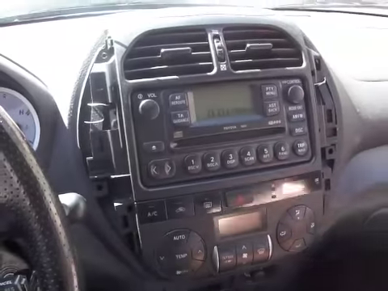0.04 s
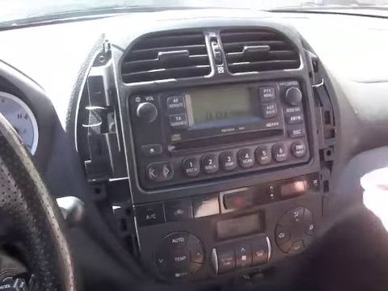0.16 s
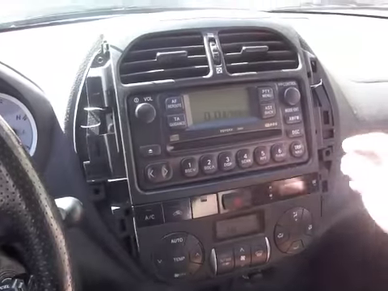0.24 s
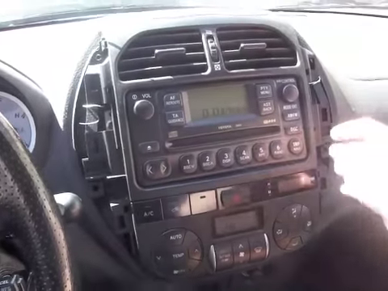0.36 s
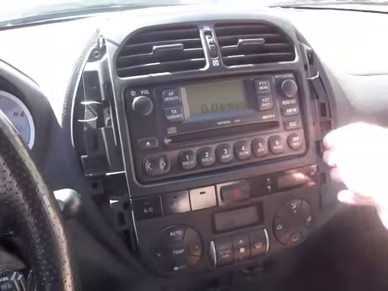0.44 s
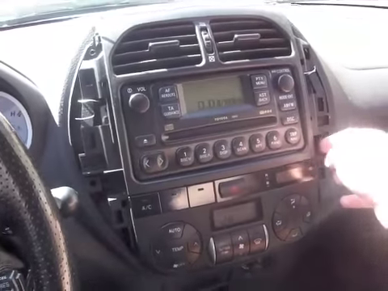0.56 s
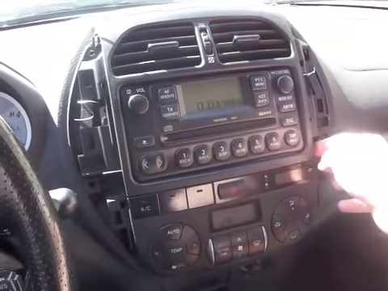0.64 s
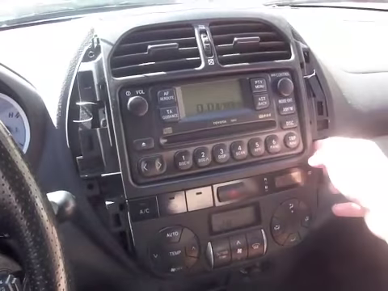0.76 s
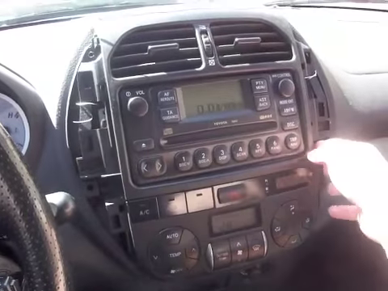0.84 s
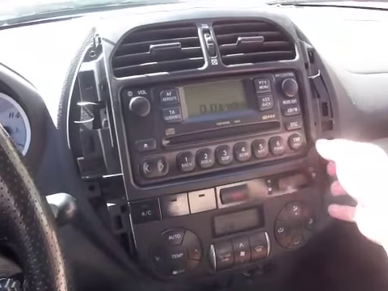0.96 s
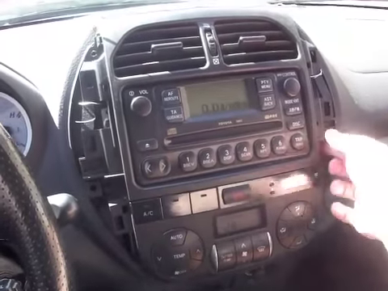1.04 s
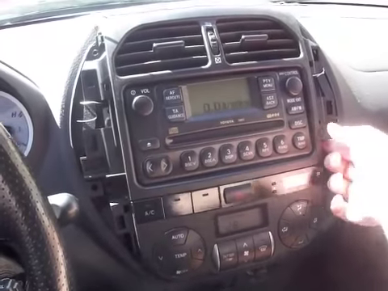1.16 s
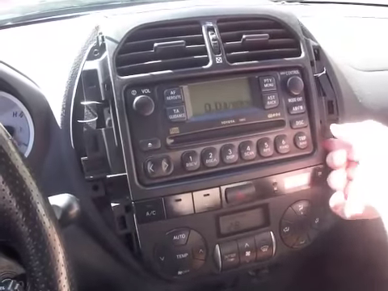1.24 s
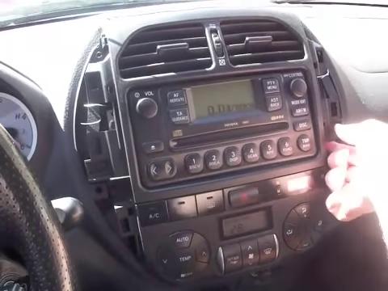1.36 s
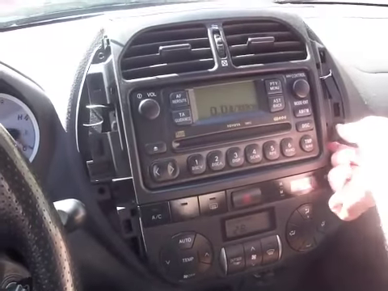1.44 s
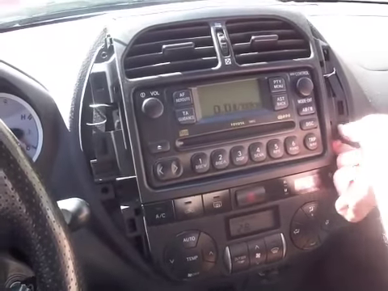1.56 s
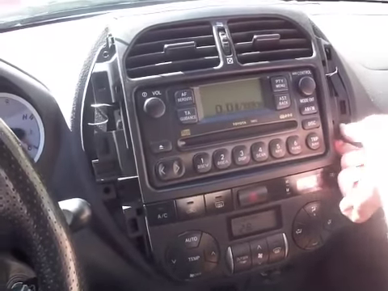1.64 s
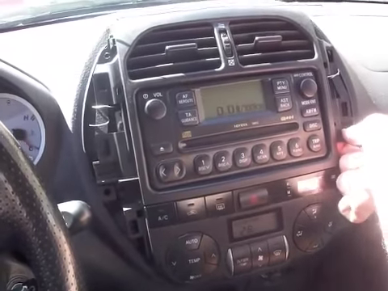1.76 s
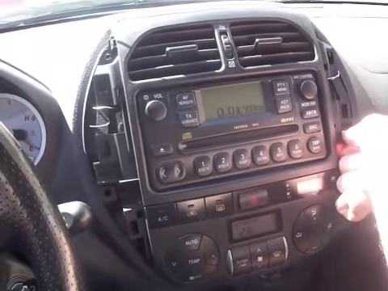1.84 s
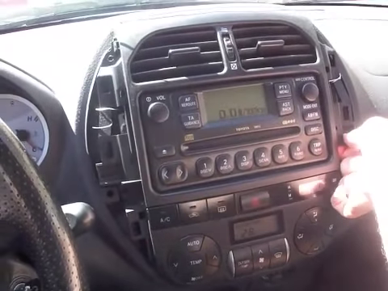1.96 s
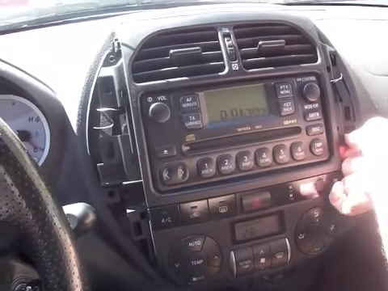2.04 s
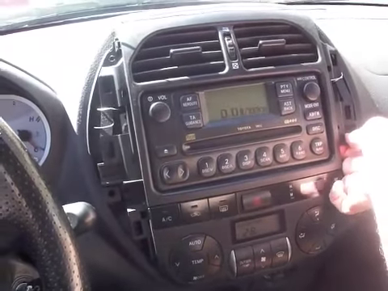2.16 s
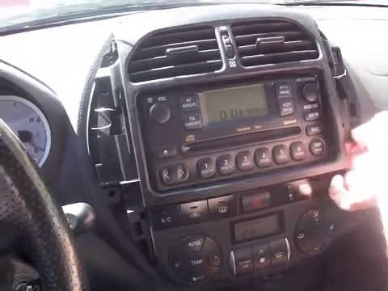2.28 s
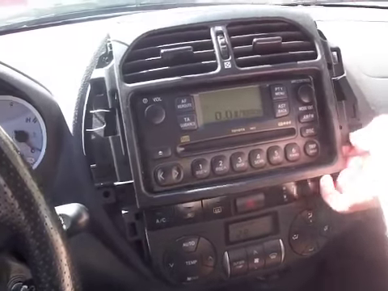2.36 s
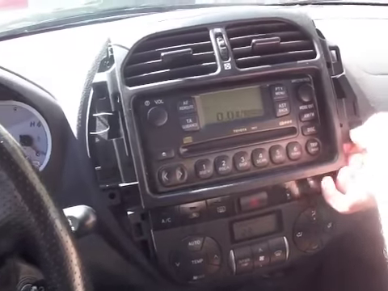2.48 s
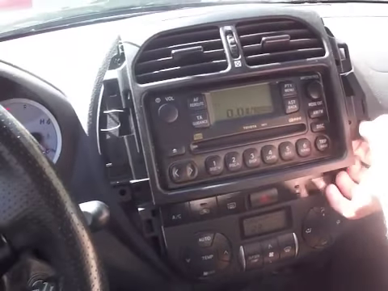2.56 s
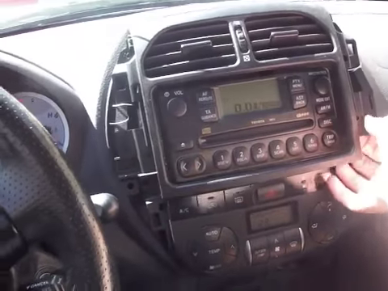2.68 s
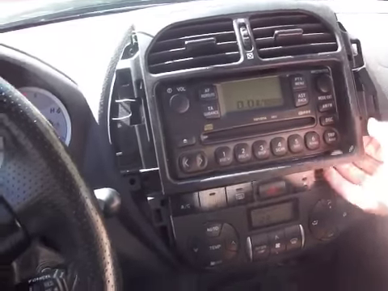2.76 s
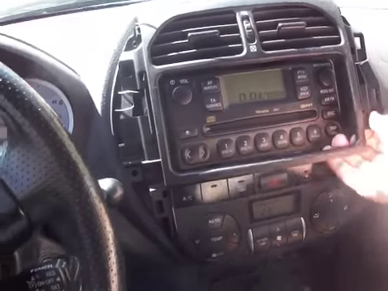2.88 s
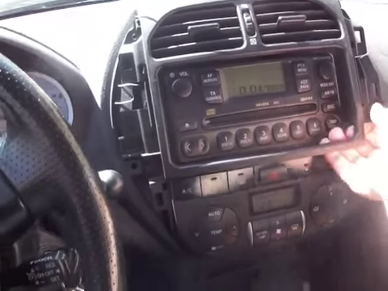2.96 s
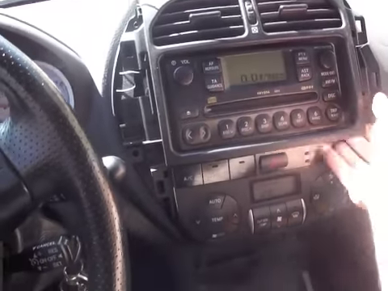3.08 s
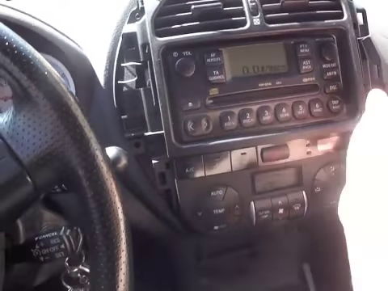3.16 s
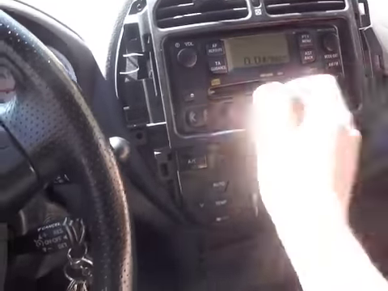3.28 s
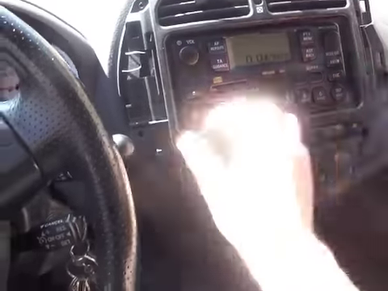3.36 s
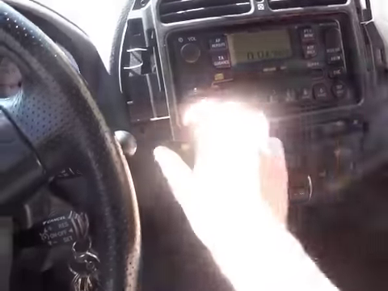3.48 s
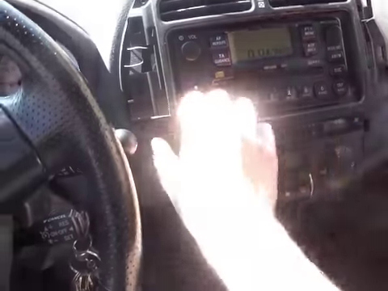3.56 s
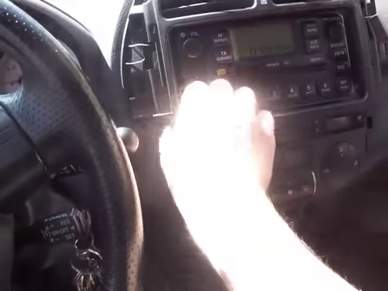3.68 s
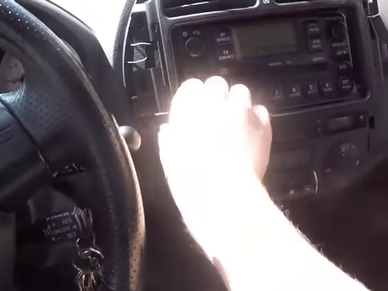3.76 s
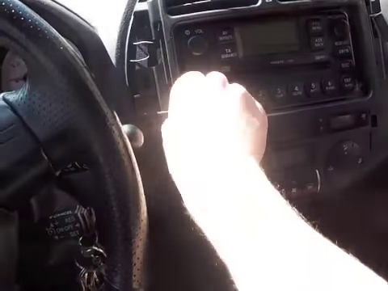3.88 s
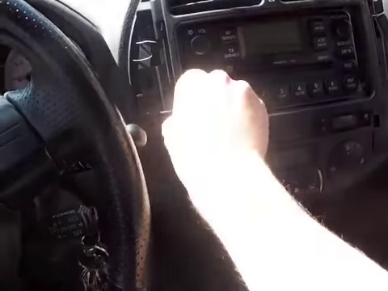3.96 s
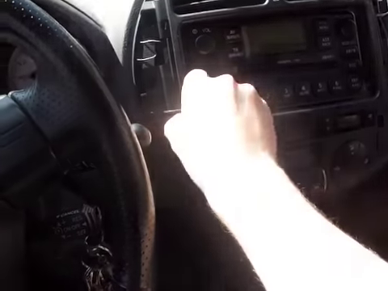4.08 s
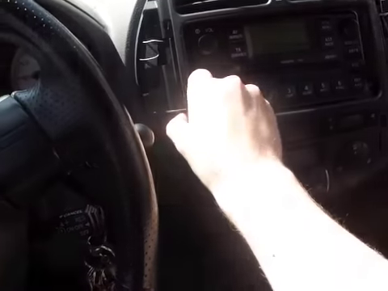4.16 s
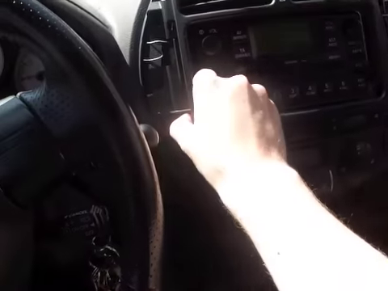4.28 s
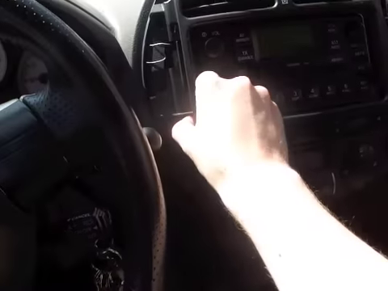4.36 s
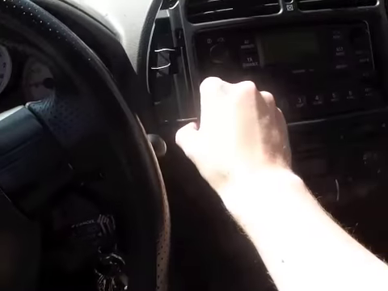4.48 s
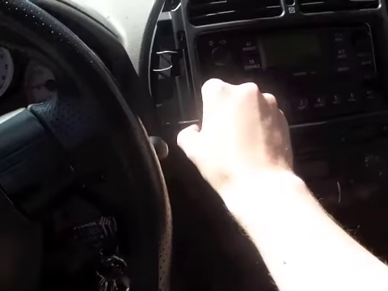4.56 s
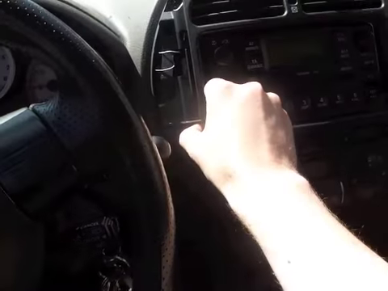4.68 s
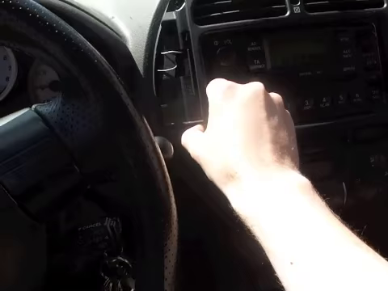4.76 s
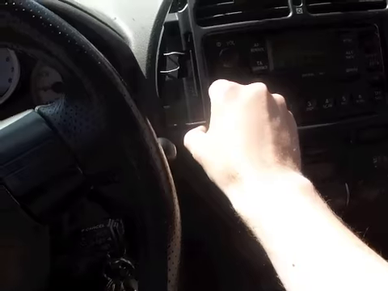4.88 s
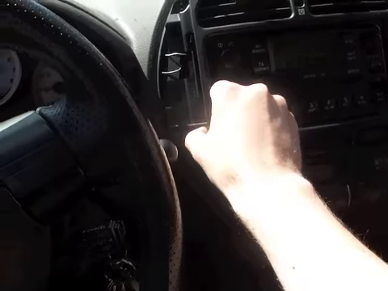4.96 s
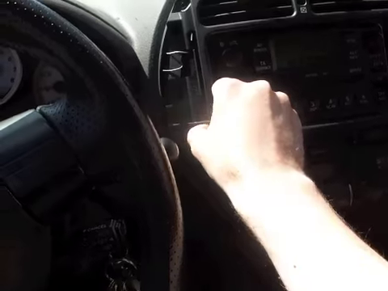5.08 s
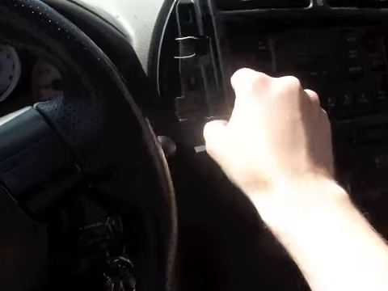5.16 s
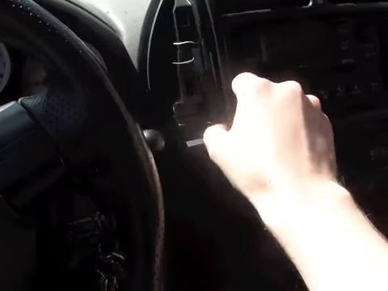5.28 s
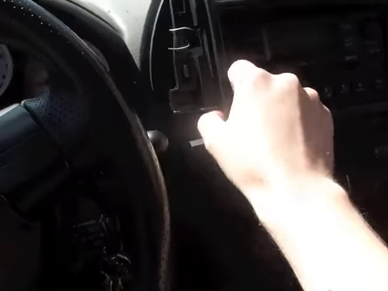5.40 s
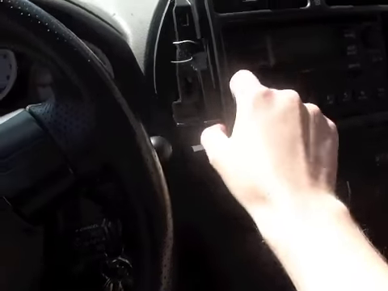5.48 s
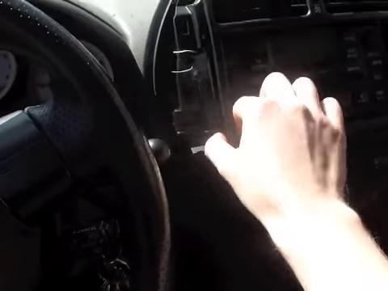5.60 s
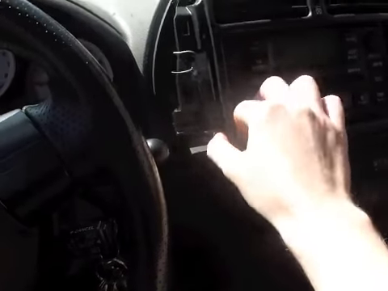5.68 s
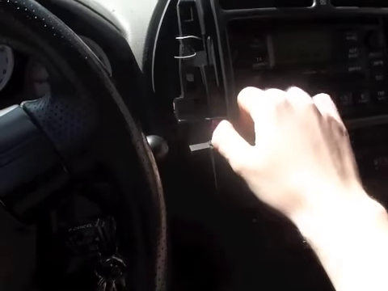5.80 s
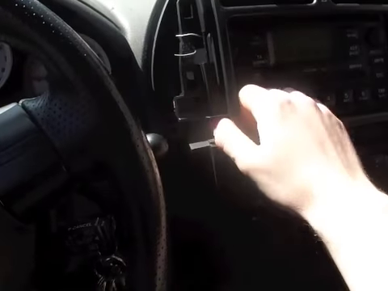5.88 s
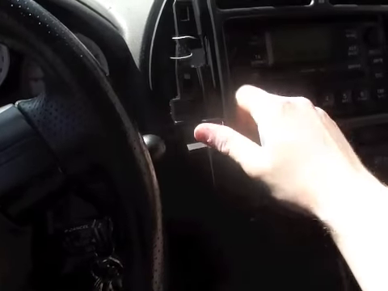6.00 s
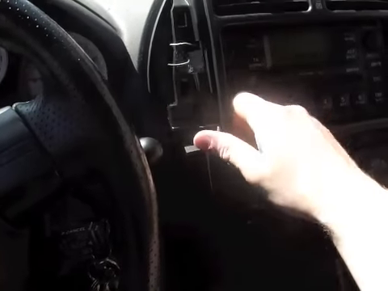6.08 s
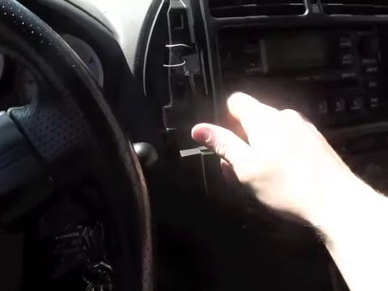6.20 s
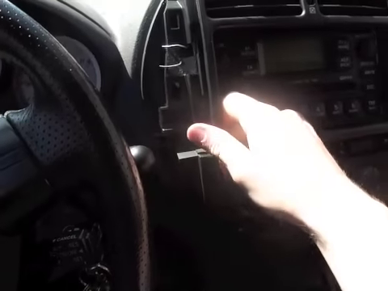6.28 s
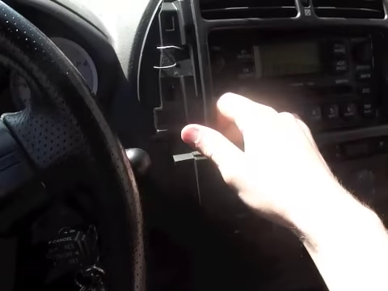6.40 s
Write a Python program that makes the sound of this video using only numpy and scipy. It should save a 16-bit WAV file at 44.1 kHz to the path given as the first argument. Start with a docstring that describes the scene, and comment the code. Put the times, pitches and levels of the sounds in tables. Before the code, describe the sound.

Strained plastic clips click irregularly and twice snap loose with a short clatter, close by inside a quiet parked car.

```python
"""A short rub and a dry click, close by in a parked car: a hand is prying the dashboard's plastic surround.
Fingers slide on the plastic, a sleeve rustles, and a soft wash of outdoor noise seeps into the cabin.
The strained clips creep by stick-slip friction, each slip a click; faint thin whistles come and go.
Twice the clips let go with a snap that excites the panel's modes and sets it clattering on the dash."""
import sys
import numpy as np
from scipy import signal
from scipy.fft import rfft, irfft
from scipy.io import wavfile
from scipy.ndimage import uniform_filter1d

SR = 44100
rng = np.random.default_rng(int(sys.argv[2]) if len(sys.argv) > 2 else 0)


def log_audio(samples):
    """Write samples as a 16-bit WAV file to the path given in sys.argv[1]."""
    # one column per channel
    frames = np.atleast_2d(samples).T
    # limit to full scale, then quantise
    limited = np.clip(frames, -1, 1)
    pcm = np.round(limited * 32767).astype(np.int16)
    wavfile.write(sys.argv[1], SR, pcm)


N = 284004
EVENT_SIZE = 16384  # samples in one rub, click or snap
T = np.arange(EVENT_SIZE) / SR
TICK_SHARE = 0.7  # the bright tick is driven only during this first share of a slip

# Spectra of a slip's bright tick and of the dash's soft answer. Each row: frequency in Hz, gain in dB.
TICK_SPECTRUM = [(1500, -39.5), (2800, -14), (3600, -8), (4600, -11.5), (5800, 0), (7000, 1.5), (9700, 0.5),
                 (10800, -8), (11600, -13.5), (12500, -58), (15000, -26)]
SOFT_THUD_SPECTRUM = [(40, -37), (140, -17), (280, -2.5), (400, -1), (480, 1.5), (560, -10.5), (900, -42)]
# Coherence between the ears, for the dash and for diffuse sound. Each row: frequency in Hz, correlation.
DASH_COHERENCE = [(100, .96), (700, .94), (1400, .85), (2300, .75), (4000, .5), (11000, .5)]
DIFFUSE_COHERENCE = [(50, 0.28), (130, 0.1), (300, 0.033), (600, 0.018), (1200, 0.022), (3000, 0.033),
                     (10000, 0.16)]


def amp(db):
    """Amplitude ratio of a level in decibels."""
    return 10 ** (np.asarray(db) / 20)


def unit_rms(x):
    """Normalises a signal to unit mean power."""
    return x / np.sqrt(np.mean(x ** 2) + 1e-20)


def at_level(x, db, count=441):
    """Sets the RMS level of the first count samples, averaged to mono."""
    return x * amp(db) / np.sqrt(np.mean(x.mean(0)[:count] ** 2) + 1e-20)


def curve(points, hz):
    """Interpolates a table along a logarithmic frequency axis."""
    table_hz, value = np.transpose(points)
    return np.interp(np.log(hz + 1), np.log(table_hz + 1), value)


def peaks(rows, hz):
    """Bell-shaped bands in dB. Each row: centre in Hz, width in Hz, height in dB."""
    return sum(db * np.exp(-((hz - centre_hz) / width) ** 2) for centre_hz, width, db in rows)


def add(mix, start, sound):
    """Superposes a sound on the mix from start seconds on."""
    part = mix[:, max(round(start * SR), 0):][:, :sound.shape[1]]
    part += sound[:, :part.shape[1]]


def noise(size, coherence=DASH_COHERENCE):
    """Partly coherent stereo white noise: the ratio of mid to side sets the correlation."""
    a, b = rfft(rng.standard_normal((2, size)))
    same = np.clip(curve(coherence, np.fft.rfftfreq(size, 1 / SR)), -.99, .99)
    mid, side = a * np.sqrt((1 + same) / 2), b * np.sqrt((1 - same) / 2)
    return irfft(np.array([mid + side, mid - side]), size)


def colour(x, db_at):
    """Minimum-phase filter: its phase follows from the gain db_at(hz) by the Hilbert transform."""
    log_gain = np.log(amp(db_at(abs(np.fft.fftfreq(EVENT_SIZE // 4, 1 / SR)))))
    response = np.exp(np.conj(signal.hilbert(log_gain)))
    taps = np.fft.ifft(response).real[:EVENT_SIZE // 8]
    return signal.fftconvolve(x, taps[None], axes=1)[:, :x.shape[1]]


def flutter(seconds):
    """Random modulation of unit RMS, smoothed over the given time."""
    size = max(int(seconds * SR), 1)
    return unit_rms(uniform_filter1d(uniform_filter1d(rng.standard_normal(N), size), size))


def modal_ripple(spacing_hz, depth_db):
    """Modal coupling: each spot of the plastic favours some resonances and misses others."""
    grid = np.arange(256) * spacing_hz
    bumps_db = depth_db * np.clip(rng.standard_normal(256), -2, 2)
    return lambda hz: np.interp(hz, grid, bumps_db)


def knock_colour(centre_hz, lean_db=7, boost_db=6.0, width_octaves=0.16, usual_hz=1400):
    """Local resonance: one peak dominates, and a stiffer, higher spot tilts the spectrum to the treble."""
    # The plastic's knock. Each row: frequency in Hz, gain in dB.
    spectrum = [(200, -38), (480, -13.5), (690, -3), (880, 1), (1200, 2.5), (1500, 2), (1800, -0.5),
                (2300, 3), (2700, -10.5), (3500, -15.5), (5000, -29.5), (9000, -66)]
    db_per_octave = lean_db * np.log2(centre_hz / usual_hz)
    ripple = modal_ripple(spacing_hz=117.8, depth_db=4.0)
    resonance = [(centre_hz, centre_hz * (2 ** width_octaves - 1), boost_db)]
    return lambda hz: (curve(spectrum, hz) + db_per_octave * np.log2(np.clip(hz, 600, 3500) / usual_hz)
                       + peaks(resonance, hz) + ripple(hz))


def rubs(slips_per_s=500, grain_db=4, steady_power=0.44, grain_s=0.0043, release_t60=0.089):
    """Sliding friction: skin or plastic on plastic drives the panel with a shower of tiny slips."""
    # Each row: start in seconds, length in seconds, relative level in dB, strongest resonance in Hz.
    strokes = [(0.0, 0.049, -39, 1110), (0.529, 0.039, -47.5, 1080), (1.053, 0.1, -52.5, 900),
               (1.279, 0.12, -55.5, 1380), (2.603, 0.066, -42, 1480), (2.729, 0.045, -48.5, 1370),
               (2.784, 0.044, -36.5, 1040), (2.837, 0.19, -47.5, 1080), (3.101, 0.04, -48.5, 1020),
               (3.502, 0.011, -47, 910), (3.57, 0.058, -52, 1060), (3.708, 0.025, -47, 910),
               (5.142, 0.011, -38, 920), (5.629, 0.02, -48.5, 1080), (5.822, 0.068, -44, 1410),
               (5.97, 0.03, -44, 1300), (6.042, 0.095, -50.5, 1370)]
    out = np.zeros((2, N))
    for start, length, db, centre_hz in strokes:
        slipping = rng.random(EVENT_SIZE) < slips_per_s / SR
        slips = slipping * amp(grain_db * np.minimum(rng.exponential(1, EVENT_SIZE), 3))
        slip_power = signal.lfilter([1], [1, -np.exp(-1 / (grain_s * SR))], slips ** 2)
        attack = np.minimum(T / (0.033 * length), 1)
        release = amp(-60 * np.maximum(T - 0.59 * length, 0) / release_t60)
        friction = noise(EVENT_SIZE) * np.sqrt(steady_power + slip_power) * attack * release
        body = colour(friction, knock_colour(centre_hz, lean_db=15.5, boost_db=4.5))
        hiss = colour(friction, lambda hz: curve(TICK_SPECTRUM, hz))
        thud = colour(friction, lambda hz: curve(SOFT_THUD_SPECTRUM, hz))
        for part, offset_db in (body, -0.5), (hiss, -13.5), (thud, -10):
            add(out, start, at_level(part, db + offset_db, int(length * SR)))
    return out


def sleeve_rustle(attack_s=0.014, sag_db=6.5, release_s=0.025, rest_db=-67, gain_db=4.5):
    """Cloth friction: each brush of the sleeve starts quickly, slows and stops; their powers add."""
    # Each row: start in seconds, length in seconds, relative level in dB.
    brushes = [(0.0, 0.67, -57.5), (1.037, 0.81, -68.5), (1.873, 0.042, -51), (2.666, 0.49, -57),
               (3.535, 0.21, -57), (3.88, 0.06, -54), (5.422, 0.12, -48.5), (5.588, 0.1, -51.5),
               (5.924, 0.14, -57.5), (6.19, 0.022, -45)]
    # Rubbing cloth. Each row: frequency in Hz, relative spectral density in dB.
    spectrum = [(40, -40), (300, -19), (1000, 5), (2000, 5.5), (3000, -13.5), (4500, -20.5), (6000, -4),
                (9500, -2.5), (11000, -10), (12000, -27)]
    t, power = np.arange(N) / SR, amp(rest_db) ** 2
    for start, length, db in brushes:
        age = t - start
        moving = np.clip(age / attack_s, 0, 1) * np.clip(1 - (age - length) / release_s, 0, 1)
        power = power + (moving * amp(db - sag_db * np.clip(age / length, 0, 1))) ** 2
    cloth = unit_rms(colour(noise(N, DIFFUSE_COHERENCE), lambda hz: curve(spectrum, hz)))
    return cloth * np.sqrt(power) * amp(gain_db + 2.5 * flutter(0.033))


def outdoor_wash(start_db=-50, ebb_db_per_s=0.24, flutter_db=1.4):
    """A diffuse field: outdoor noise seeps in from all sides and slowly ebbs."""
    # Outdoor noise inside the car. Each row: frequency in Hz, relative spectral density in dB.
    spectrum = [(20, -51), (48, -14.5), (95, -17.5), (140, -3.5), (260, 0.5), (450, 2), (600, 1.5),
                (950, 2), (1400, -1), (2100, -3.5), (2700, -18.5), (3500, -23), (6000, -18.5),
                (10000, -31.5), (12000, -49)]
    wash = unit_rms(colour(noise(N, DIFFUSE_COHERENCE), lambda hz: curve(spectrum, hz)))
    return wash * amp(start_db - ebb_db_per_s * np.arange(N) / SR + flutter_db * flutter(0.025))


def cabin_echo(x, onset_s=0.0041):
    """Reverberation: glass and upholstery return a short, dense, exponentially decaying tail."""
    # Each row: frequency in Hz, reverberation time in seconds.
    decay_times = [(150, 0.37), (400, 0.3), (1000, 0.14), (2300, 0.082), (6000, 0.17), (11000, 0.12)]
    hz, t, spectra = signal.stft(noise(EVENT_SIZE), SR, nperseg=256)
    decay = amp(-60 * t / curve(decay_times, hz)[:, None])
    tail = signal.istft(spectra * decay, SR, nperseg=256)[1][:, :EVENT_SIZE]
    tail = tail * np.clip(T / onset_s - 1, 0, 1)
    return signal.fftconvolve(x, tail / np.linalg.norm(tail[0]), axes=1)[:, :N]


def burst(slip_s, rise_s, t60):
    return noise(EVENT_SIZE) * (1 - np.exp(-T / rise_s)) * amp(-60 * np.maximum(T - slip_s, 0) / t60)


def tick_colour():
    """Resonance of the retaining clips puts narrow peaks on the bright part of a blow."""
    # Each row: frequency in Hz, width in Hz, gain in dB.
    clip_resonances = [(3630, 380, -3), (6010, 99, 1.5), (6500, 45, 1.5), (8020, 67, 5.5),
                       (10000, 160, 2.5)]
    ripple = modal_ripple(spacing_hz=260, depth_db=3)
    return lambda hz: curve(TICK_SPECTRUM, hz) + peaks(clip_resonances, hz) + ripple(hz)


def panel_ring(centre_hz, damping, off_centre_db=7):
    """Damped modes: a blow best excites those near its own pitch; strain and grip shorten them."""
    # Each row: frequency in Hz, relative level in dB, seconds to fall 60 dB at a damping of 1.
    modes = [(165, -15.5, 0.3), (231, -33, 0.28), (297, 8, .3), (374, -2.5, 0.27), (424.4, 5, 0.44),
             (623, -29, 0.29), (723, 7, 0.12), (700, 2, 0.36), (926, 11.5, 0.17), (1015, -8, 0.76),
             (1066, -11, 0.15), (1225, -7, 1), (1470, -27, 0.17), (1483, 17, 0.25), (1537, 14, 0.17),
             (1820, -19, 0.13), (2020, 25.5, 0.06), (2200, -19, .25), (2430, 1, 0.75)]
    hz, db, t60 = np.transpose(modes)[:, :, None]
    scatter, phase, spread = rng.standard_normal((3, len(modes), 1))
    db = db + 2 * scatter - off_centre_db * np.minimum(abs(np.log2(hz / centre_hz)), 1)
    envelope = amp(db - 60 * T * damping / t60) * (1 - np.exp(-T / 0.0037))
    angle = 2 * np.pi * (hz * T + phase)
    return np.array([(envelope * np.sin(angle + 0.3 * side * spread)).sum(0) for side in (-1, 1)])


def clicks(usual_slip_s=0.0014, usual_db=-39, doubling_db=2.5):
    """Stick-slip of the strained clips: a tick, a knock, a brief ring and the dash's late, soft thud."""
    # Each row: start in seconds, reference level in dB, tick above it in dB, strongest resonance in Hz.
    slips = [(0.0258, -33, -9, 1670), (0.935, -59.5, 6.5, 890), (0.953, -64, 9, 900),
             (1.175, -43, -9, 3150), (1.2204, -43, -17, 1940), (1.599, -39, -16.5, 1700),
             (1.671, -40.5, -2, 1900), (1.7446, -46.5, 7.5, 1550), (1.784, -33.5, 0.5, 2100),
             (1.9661, -38, -2, 1060), (2.0211, -40.5, 2, 1890), (2.0306, -49, 5, 1500),
             (2.104, -33.5, -3, 2300), (2.1453, -42.5, -2.5, 1170), (2.246, -44, -2.5, 1190),
             (2.258, -43, -2, 990), (2.272, -35.5, -4, 1210), (2.5267, -41.5, -0.5, 1230),
             (2.5452, -41.5, -3, 2090), (2.5732, -37, 0, 2040), (2.5877, -39, 0, 1280),
             (2.7551, -49, 5.5, 1600), (2.8121, -34, 0, 1410), (2.9271, -45, -12.5, 1570),
             (3.1379, -45.5, -11, 920), (4.0127, -36.5, -1, 1570), (4.0286, -35, 1, 1170),
             (4.0675, -37, 3.5, 1460), (4.1385, -38.5, -0.5, 1070), (4.183, -39, 5, 2150),
             (4.19, -36.5, -1, 2000), (4.2527, -39, -27, 1770), (4.312, -38, 2.5, 2300),
             (4.35, -33.5, 7, 1210), (4.4119, -38, 2, 2270), (4.4741, -41.5, 1.5, 2380),
             (4.567, -43, -0.5, 2060), (4.6878, -32.5, 3, 1340), (4.7854, -36.5, 0.5, 2330),
             (4.911, -35.5, -2, 1300), (5.0403, -39, 0.5, 1160), (5.473, -39.5, -6.5, 1440),
             (5.6014, -44, -0.5, 2340), (5.665, -46.5, 0, 2340), (5.8871, -39.5, -1.5, 2230),
             (6.0527, -35.5, -9.5, 1160), (6.109, -45, -3.5, 1700), (6.371, -44.5, -7, 2470),
             (6.4187, -38.5, 1.5, 1230)]
    out = np.zeros((2, N))
    for start, db, tick_db, centre_hz in slips:
        slip_s = usual_slip_s * 2 ** ((db - usual_db) / doubling_db)  # stronger slips last longer
        tick = colour(burst(slip_s * TICK_SHARE, rise_s=0.00021, t60=0.031), tick_colour())
        knock = colour(burst(slip_s, rise_s=0.00056, t60=0.042), knock_colour(centre_hz))
        thud = colour(burst(0.0075, rise_s=0.0024, t60=0.064), lambda hz: curve(SOFT_THUD_SPECTRUM, hz))
        ring = panel_ring(centre_hz, damping=2.6)
        add(out, start, at_level(tick, db + tick_db) + at_level(knock, db + 1.5) + at_level(ring, db - 14))
        add(out, start + 0.00891, at_level(thud, db - 15, count=882))
    return out


def whistles(jitter_hz=150, waver_db=3):
    """Random frequency and amplitude modulation roughens thin tones that swell, glide and fade."""
    # Each row: start and end in seconds, first and last pitch in Hz, relative level in dB.
    glides = [(0.638, 0.797, 5560, 5480, -66), (0.77, 0.898, 5500, 5680, -57),
              (1.361, 1.592, 2074, 1908, -54), (1.486, 1.912, 5380, 5820, -59.5),
              (1.943, 2.271, 5460, 6000, -54.5), (5.848, 6.326, 2004, 1856, -53.5)]
    out, jitter = np.zeros((2, N)), flutter(0.00051)
    for start, end, first_hz, last_hz, db in glides:
        stray_hz = jitter_hz * jitter[int(start * SR):][:int((end - start) * SR)]
        cycles = np.cumsum(np.linspace(first_hz, last_hz, len(stray_hz)) + stray_hz) / SR
        tone = np.sqrt(2) * np.cos(2 * np.pi * cycles) * signal.windows.tukey(len(cycles), .8)
        add(out, start, amp(db - 1) * np.array([tone, tone]))
    return out * amp(waver_db * flutter(0.0069))


def rebounding_blows(first_gap_s=0.0135, gap_growth=1.08, loss_db=4.5, dulling_db=2.5):
    """Inelastic rebound: while a blow's rattle lasts, the loose panel strikes again, weaker and duller."""
    # A clip lets go or the freed panel hits the dash. Each row: start in seconds, reference level in dB,
    # thud and tick above it in dB, strongest resonance in Hz, length of the rattle in seconds.
    blows = [(2.2884, -16.5, -8, -6.5, 930, 0), (2.3414, -30, -10, 4.5, 1010, 0),
             (2.3503, -30, -10.5, 9, 1420, 0), (2.368, -27.5, -14.5, -6, 1160, 0.02),
             (2.395, -21, -29, 1, 1840, 0.072), (2.4756, -43.5, -19, 1.5, 1250, 0),
             (5.149, -15.5, -10, -5.5, 810, 0), (5.1729, -20.5, -16.5, 0.5, 1110, 0.054),
             (5.236, -26.5, -18, 3, 1250, 0.02), (5.257, -23.5, -12.5, -8.5, 1360, 0),
             (5.303, -36, -14, -7.5, 1120, 0), (5.3542, -38.5, -12, 2.5, 1910, 0),
             (5.374, -33.5, -27, -7, 1350, 0)]
    delays = np.append(0, np.cumsum(first_gap_s * gap_growth ** np.arange(8)))
    return [(start + delay, db - k * loss_db, thud_db, tick_db - k * dulling_db, centre_hz)
            for start, db, thud_db, tick_db, centre_hz, rattle_s in blows
            for k, delay in enumerate(delays) if delay <= rattle_s]


def snaps(usual_release_s=0.003, usual_hz=970):
    """Sudden release of elastic energy: a crack, a freer ring of the panel, and the hollow dash's thud."""
    # The hollow dash. Each row: frequency in Hz, gain in dB.
    thud_spectrum = [(25, -30), (60, -20), (100, -16), (135, -4.5), (220, -4), (420, -2), (600, -12.5),
                     (900, -26)]
    out = np.zeros((2, N))
    for start, db, thud_db, tick_db, centre_hz in rebounding_blows():
        slip_s = usual_release_s * (usual_hz / centre_hz) ** 1.5  # stiffer spots let go sooner
        tick = colour(burst(slip_s * TICK_SHARE, rise_s=0.00016, t60=0.042), tick_colour())
        crack = burst(slip_s, rise_s=0.00018, t60=0.067)
        knock = colour(crack, knock_colour(centre_hz, lean_db=11.0, boost_db=3.5))
        thud = colour(burst(0.0044, rise_s=0.0056, t60=0.13), lambda hz: curve(thud_spectrum, hz))
        ring = panel_ring(centre_hz, damping=1.57)
        add(out, start, at_level(tick, db + tick_db) + at_level(knock, db + 2) + at_level(ring, db - 8))
        add(out, start + 0.0018, at_level(thud, db + thud_db, count=882))
    return out


def scene(creep_echo_db=-21, snap_echo_db=-14):
    """Superposition: the plastic and its echo, placed by level difference, over the quiet background."""
    # Level difference between the ears. Each row: frequency in Hz, left minus right in dB.
    balance = [(100, -1), (1100, 1), (2000, -2.5), (3600, 0), (6500, -4.5), (11500, -5)]
    creep, snapping = clicks() + rubs(), snaps()
    plastic = creep + snapping + cabin_echo(amp(creep_echo_db) * creep + amp(snap_echo_db) * snapping)
    balance_db = curve(balance, np.fft.rfftfreq(N, 1 / SR))
    plastic = irfft(rfft(plastic) * amp(np.outer([.5, -.5], balance_db)), N)
    return plastic + outdoor_wash() + sleeve_rustle() + whistles()


def record(dry, ceiling=.85, bass_hz=32, top_hz=11200, edge_hz=12400, fall_db_per_hz=0.02):
    """Microphone response: notched treble, thinned extremes, soft saturation and a band limit."""
    # Notches cut by the microphone's housing. Each row: frequency in Hz, width in Hz, depth in dB.
    dips = [(3025, 190, 15.5), (4034, 228, 13), (5010, 194, 12.5)]
    notched = colour(dry, lambda hz: -peaks(dips, hz)
                     - fall_db_per_hz * np.clip(hz - top_hz, 0, edge_hz - top_hz))
    thinned = signal.sosfilt(signal.butter(2, bass_hz, "high", fs=SR, output="sos"), notched)
    rounded = thinned / (1 + (thinned / ceiling) ** 4) ** (1 / 4)
    band_limit = signal.firwin(255, edge_hz, window=("kaiser", 8), fs=SR)
    return signal.oaconvolve(rounded, band_limit[None], "same")


dry = scene()
out = record(dry)
log_audio(out)
```